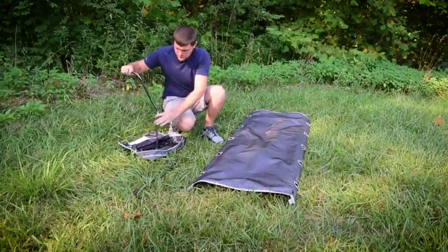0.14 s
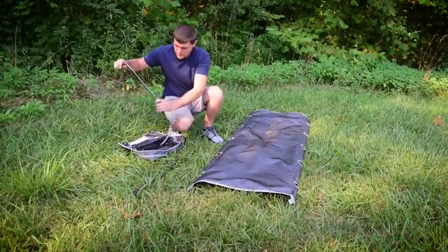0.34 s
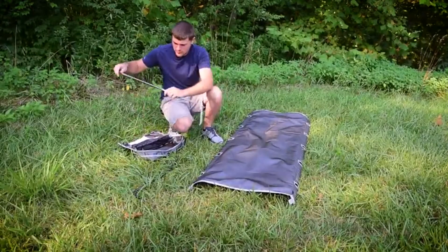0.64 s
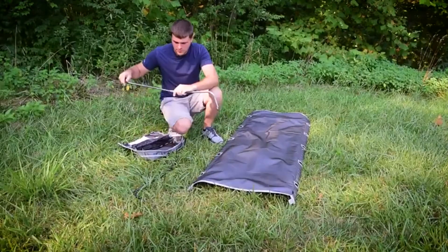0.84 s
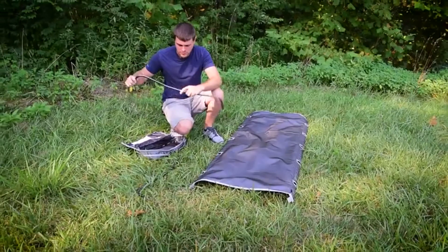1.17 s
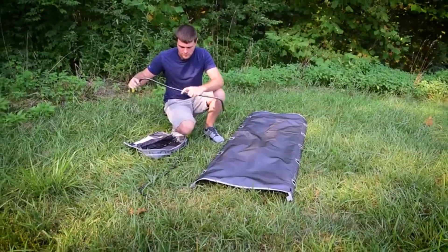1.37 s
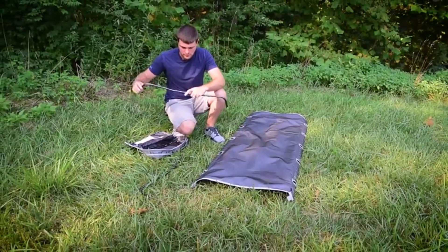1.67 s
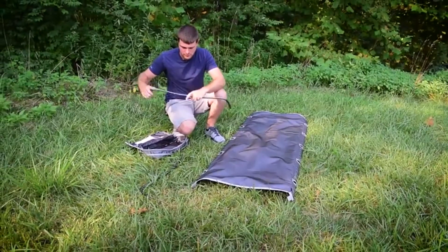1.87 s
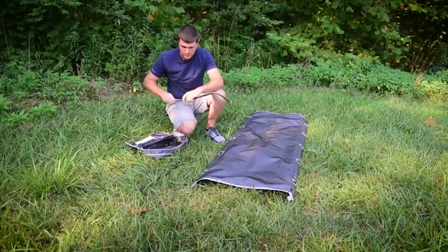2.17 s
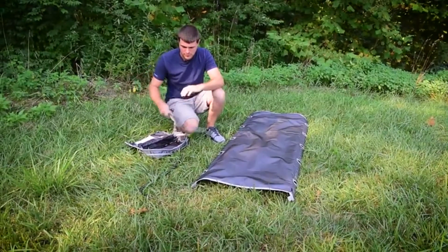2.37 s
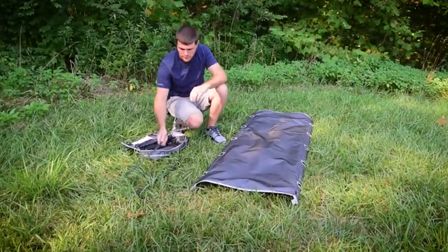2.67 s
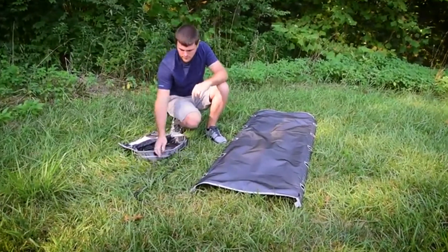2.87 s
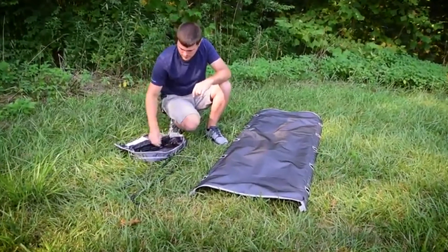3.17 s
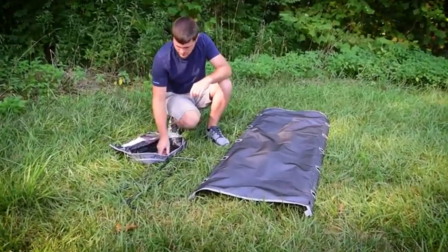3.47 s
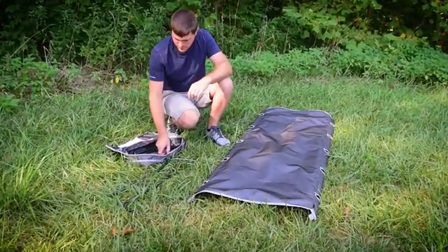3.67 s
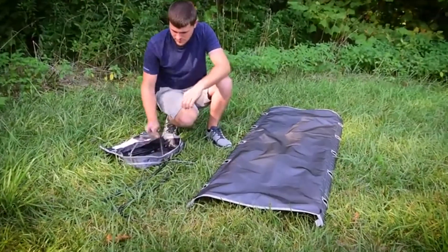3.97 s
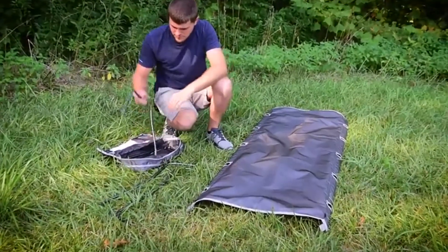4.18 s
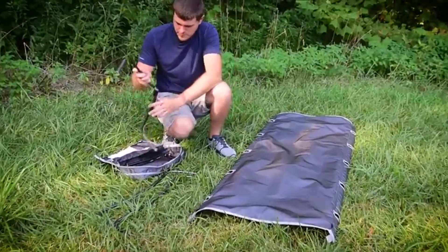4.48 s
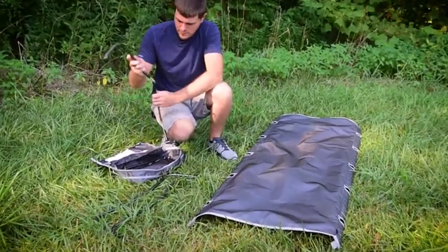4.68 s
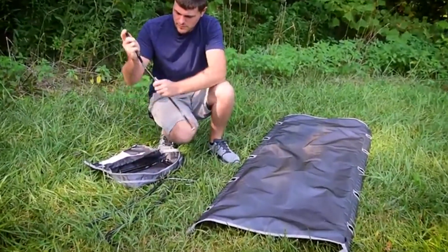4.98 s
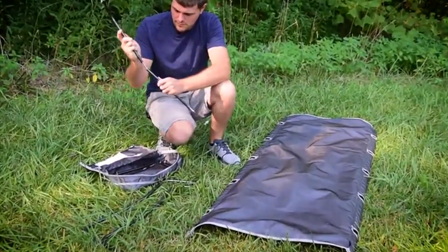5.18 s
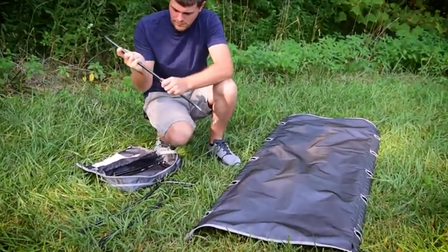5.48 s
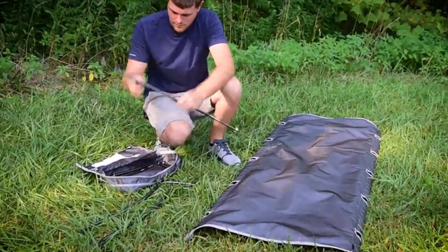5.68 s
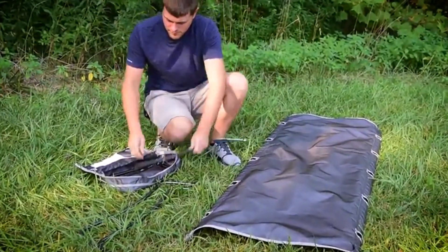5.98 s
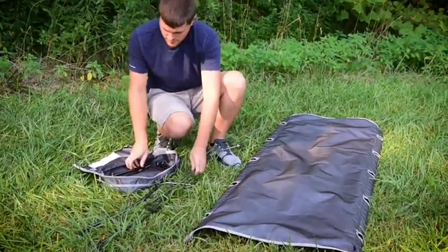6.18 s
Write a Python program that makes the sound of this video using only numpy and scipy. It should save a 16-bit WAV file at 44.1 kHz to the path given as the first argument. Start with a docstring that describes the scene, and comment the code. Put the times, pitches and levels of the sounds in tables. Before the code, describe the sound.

Thin metal tubes are pulled from a cloth bag and joined by hand on grass. An opening rattle gives way to isolated snaps, the strongest just before two seconds. Rummaging and clacking return midway, followed by light ticking, a rapid ratchety scrape and one hard knock, then a last rustle and clatter. Insects shimmer throughout above a very faint rumble; the microphone fills the left side only.

```python
"""Metal cot poles come out of a fabric bag and are plugged together by someone crouching on a lawn.
Loose poles clack, thud and scrape: noise cracks excite tube modes, and the bundle in the bag rings along.
Hand-damped joints snap home as short mode bursts; the last judders in by stick-slip before a sharp knock.
Rubbed cloth is grainy noise through bag resonances; insects and far-off rumble are filtered noise behind.
The microphone feeds the left channel; the right holds little but preamplifier hiss."""
import sys
import numpy as np
from scipy import signal
from scipy.fft import rfft, irfft
from scipy.io import wavfile
from scipy.ndimage import uniform_filter1d

SR = 44100
rng = np.random.default_rng(int(sys.argv[2]) if len(sys.argv) > 2 else 0)


def transcribe(u):
    """Save the signal u as a 16-bit wav file named by the first command-line argument.

    u: samples, shape (n,) or (channels, n), limited to [-1, 1]; the rate is SR.
    q: integer samples, one column per channel.
    """
    v = np.clip(np.atleast_2d(u).T, -1, 1)
    q = np.round(v * 32767).astype(np.int16)
    wavfile.write(sys.argv[1], SR, q)


N = 279153

# insect chorus swells: (time [s], base level [dB])
INSECT_SWELLS = [(0.0, -49.5), (0.9, -52), (1.6, -49), (1.83, -51), (3.45, -54.5), (3.95, -51.5),
                 (5.48, -49.5), (5.8, -53), (6.33, -53)]
# spectrum of the insects: (frequency [Hz], relative level [dB])
INSECT_SPECTRUM = [(1500, -47.5), (2300, -14), (2900, -6), (3500, 0), (4300, 1), (5200, -0.5), (6300, -1),
                   (7500, -6), (8800, -17), (11000, -26), (15500, -46)]
# spectrum of the far-off rumble: (frequency [Hz], relative level [dB])
AIR_SPECTRUM = [(20, -11), (55, -1), (110, 0), (220, -4), (500, -9), (1200, -12), (2500, -10.5),
                (8000, -37.5)]
# spectrum of preamplifier hiss: (frequency [Hz], relative level [dB])
HISS_SPECTRUM = [(20, -22), (100, -12), (300, -11.5), (1000, -14.5), (3000, -15.5), (8000, -16),
                 (12000, -16.5), (15000, -25.5)]
# a hand or a pole moving through the bag: (start [s], length [s], base level [dB], base centre [Hz])
BAG_STROKES = [(0.0, 0.13, -41, 800), (0.183, 0.059, -43, 1200), (0.278, 0.024, -44, 1190),
               (0.359, 0.041, -48, 700), (2.979, 0.17, -57.5, 1100), (3.423, 0.095, -44, 1270),
               (3.555, 0.091, -46, 1210), (3.665, 0.093, -43, 900), (3.781, 0.032, -42.5, 750),
               (3.877, 0.08, -41, 1000), (4.026, 0.13, -53, 821), (6.093, 0.07, -48.5, 1700),
               (6.141, .04, -50.5, 695), (6.179, 0.16, -44.5, 1310)]
# spectrum of rubbed cloth: (frequency [Hz], relative level [dB])
CLOTH_SPECTRUM = [(80, -44), (220, 3), (400, 9.5), (550, 5), (950, 5), (1600, 2.5), (2800, 4), (5000, -20),
                  (10000, -58), (15000, -65)]
# resonances that rubbing wakes in the bag and its poles: (frequency [Hz], base level [dB])
BAG_RESONANCES = [(420, -13.5), (530, -0.5), (830, -6), (1050, -5.5), (1420, -4), (2000, -10.5), (2900, -7)]
# spectrum of a metal contact: (frequency [Hz], relative level [dB])
CRACK_SPECTRUM = [(60, -23.5), (250, -9), (600, -4.5), (1500, -1), (3200, 0), (5000, -5), (7500, -9.5),
                  (10000, -16.5), (15000, -37)]
# modes of a pole: (base frequency [Hz], base level [dB])
POLE_MODES = [(930, 0), (1290, 2.5), (1470, -2.5), (1950, -3), (2400, 5), (2840, 4), (3060, 5.5),
              (3400, 9.5), (3780, 6.5), (4250, 6), (4800, 6), (5500, 6), (6250, 3), (6850, -3.5),
              (7900, -2), (8650, -5.5)]
# loose poles clacking together:
# (time [s], base level [dB], body re ring [dB], edge re ring [dB], strongest ring [Hz])
POLE_CLACKS = [(0.0411, -29.5, -8.5, -8.5, 3160), (0.0687, -20.5, -10, -5.5, 3100),
               (0.074, -17.5, -11.5, -10, 3950), (0.1019, -31.5, -7, -5.5, 2800),
               (0.282, -24.5, -9.5, -6, 3220), (0.351, -29, -10.5, -2, 2970), (0.375, -37, -12, -8, 2720),
               (3.515, -26, -19, -8, 2980), (3.5855, -35, -8, -17, 1390), (3.6534, -24, -15, -5, 4000),
               (3.664, -30.5, -4.5, -6, 2650), (3.7091, -26, -22, -5, 3000), (3.729, -31, -8, -17, 1466),
               (3.737, -25, -5.5, -5, 2940), (3.7983, -33, -11, -7.5, 3080), (3.886, -23, -13, -5, 2950),
               (3.893, -27, -31, -10, 3110), (3.905, -29, -11, -9, 2350), (3.912, -35, -17, -17, 2450),
               (3.937, -40.5, -4, -15, 2900), (4.15, -30, -22, -4.5, 3620), (4.1608, -24.5, -18, -3, 1627),
               (4.249, -34.5, -5, 2.5, 2870), (4.2676, -27.5, -9, -0.5, 4000), (4.275, -31, -22, -2, 4600),
               (6.212, -19.5, -17.5, -16, 1618), (6.214, -18, -31, -9.5, 2660), (6.218, -28, -14, -8, 4200),
               (6.277, -18.5, -14, -13, 5020), (6.295, -23, -34, -10.5, 4940),
               (6.3265, -26, -23, -12, 3670)]
# modes of the bundle left ringing in the bag: (base frequency [Hz], relative level [dB], t60 [s])
BUNDLE_MODES = [(407.5, -2.5, 0.11), (538, 2, 0.16), (940, -27, 0.11), (1480, -2, 0.15), (2800, -1.5, 0.18),
                (3050, 13.5, 0.12), (3400, -9, 0.21), (4040, -1, 0.076)]
# a pole bumps the bag, the ground or a palm, hollow and dull: (time [s], base level [dB], ring [Hz])
DULL_BUMPS = [(0.085, -34.5, 520), (0.245, -36, 523), (0.353, -36.5, 483), (0.398, -43.5, 523),
              (1.827, -47, 296), (3.403, -43, 543), (3.634, -40, 482), (3.666, -37, 493), (3.709, -38, 470),
              (3.737, -30.5, 960), (3.797, -37.5, 447), (4.082, -44, 560), (4.131, -41.5, 510),
              (4.156, -39.5, 535), (4.267, -31, 730), (4.28, -34, 520), (4.752, -39, 322),
              (5.471, -32.5, 630), (6.186, -38, 427)]
# short scuffs of hands, cloth and sliding poles: (time [s], length [s], base level [dB], centre [Hz])
SHORT_SCUFFS = [(0.098, 0.045, -46, 2680), (0.991, 0.049, -56, 1500), (1.392, 0.0087, -41, 1620),
                (1.801, 0.021, -44, 2980), (1.819, 0.019, -41, 2300), (1.835, 0.015, -44, 3980),
                (2.306, 0.026, -56, 1510), (2.937, 0.064, -48, 1210), (3.309, 0.053, -54.5, 567),
                (3.428, 0.041, -47.5, 1401), (3.741, 0.018, -39, 1600), (4.278, 0.039, -47, 1210),
                (4.348, 0.096, -51.5, 940), (4.512, 0.051, -41, 1780), (5.37, 0.11, -41, 2470),
                (5.777, 0.038, -56.5, 1340)]
# light dry taps of a pole against the grip or its neighbours: (time [s], level [dB], centre [Hz])
LIGHT_TAPS = [(0.245, -36, 1030), (0.281, -30, 10000), (0.309, -40.5, 1500), (0.469, -44, 1700),
              (1.037, -42, 1810), (1.228, -51.5, 1900), (2.893, -44, 2090), (2.983, -46, 2000),
              (3.007, -51, 1300), (3.503, -42, 2900), (3.544, -37, 5000), (3.634, -38.5, 2900),
              (3.963, -41, 5200), (3.993, -43, 1700), (4.326, -46, 2200), (4.391, -44, 1700),
              (4.683, -36, 1900), (4.733, -39, 900), (4.746, -36.5, 1500), (4.767, -38, 940),
              (4.774, -38.5, 1400), (4.784, -43, 890), (4.814, -42.5, 980), (4.818, -44, 1200),
              (4.831, -42, 1390), (4.847, -45, 676), (4.879, -45.5, 1190), (4.885, -45.5, 1490)]
# a pole dragged along its neighbours sings in one narrow, gliding resonance:
# (start [s], length [s], level [dB], start pitch [Hz], end pitch [Hz])
POLE_SCRAPES = [(0.253, 0.0324, -37.5, 1320, 1624), (3.479, 0.04, -47, 1295, 1690),
                (5.372, .02, -36, 3490, 3480)]
# joints snapping home:
# (time [s], base level [dB], base body [dB], base edge [dB], base t60 [s],
#  strongest ring [Hz], second ring [Hz], low ring [Hz], low ring re base level [dB])
JOINT_SNAPS = [(0.7054, -36.5, -8, -22, 0.013, 1910, 5100, 1280, -5),
               (0.707, -39.5, -26, -25, 0.012, 4440, 5400, 2900, -22),
               (1.3974, -26.5, -21.5, -13, 0.019, 4010, 4460, 1490, -13.5),
               (1.853, -22.5, -16, -5.5, 0.024, 2900, 4060, 1925, -10),
               (4.525, -30.5, -19, -22, 0.023, 3090, 3280, 1080, -14),
               (4.5313, -25, -12.5, -7, 0.015, 2305, 3620, 1420, -8),
               (4.7484, -28, -8, -3, 0.029, 4720, 3590, 2260, -10),
               (5.4708, -16.5, -12, -12, 0.013, 3900, 3370, 2320, -19)]

RUMMAGE_ATTACK_S, RUMMAGE_RELEASE_T60_S = 0.015, 0.32
# a firm clack presses the poles together and dies fast;
# a light one rings on and stirs the bundle relatively more
TYPICAL_CLACK_DB, CLACK_T60_S, T60_HALVING_DB, BUNDLE_FOLLOWS = -32, 0.038, 11.5, 0.76
# from this moment a hand holds the bundle and damps it
BUNDLE_HELD_S, BUNDLE_HELD_DB, HELD_T60_SHARE = 6.1, -10, 0.95
# a tight joint sticks and slips as it is pushed in,
# loudest at the start, weaker midway, stronger again at the end
PUSH_START_S, PUSH_END_S, SLIP_RING_HZ = 5.3858, 5.4678, 3260
SLIP_START_DB, SLIP_MIDWAY_DIP_DB, SLIP_END_RE_START_DB = -27, -3.5, -2
SLIP_QUICKENING = 0.92  # under 1: the slips come closer together as the push goes on
TOP_HZ = 15700


def undb(db):
    """Decibels to gain."""
    return 10 ** (np.asarray(db) / 20)


def unit(x):
    """Scale to rms 1."""
    return x / np.sqrt(np.mean(x ** 2) + 1e-18)


def colour(x, points):
    """Causal minimum-phase filter with the given (Hz, dB) spectrum."""
    size = 4096
    hz, db = np.transpose(points)
    bins = np.fft.rfftfreq(size, 1 / SR) + 1
    log_gain = np.log(undb(np.interp(np.log(bins), np.log(hz), db)))
    # folding the cepstrum forward in time makes the filter causal
    cepstrum = irfft(log_gain)
    cepstrum[1:size // 2] *= 2
    cepstrum[size // 2 + 1:] = 0
    impulse = irfft(np.exp(rfft(cepstrum)))
    return signal.fftconvolve(x, impulse)[:len(x)]


def band(x, hz, kind):
    """Butterworth low-pass or high-pass."""
    return signal.sosfilt(signal.butter(2, hz, kind, fs=SR, output="sos"), x)


def resonate(x, hz, q):
    """One resonance, gain 1 at its centre."""
    return signal.lfilter(*signal.iirpeak(hz, max(q, .5), fs=SR), x)


def walk(rate):
    """Random wandering with about rate new values a second, spread near 1."""
    k = int(SR / rate)
    steps = np.repeat(rng.standard_normal(N // k + 2), k)
    return unit(uniform_filter1d(steps, k))[:N]


def fade(t, t60):
    """Exponential decay, 60 dB in t60 seconds."""
    return np.exp(-np.log(1000) * t / t60)


def add(track, s, sound):
    """Mix a sound in at time s."""
    start = max(int(s * SR), 0)
    part = sound[:max(N - start, 0)]
    track[start:start + len(part)] += part


def burst_level(x, db, window_s=0.012):
    """Give a short burst the energy of window_s seconds at db."""
    return x * undb(db) * np.sqrt(window_s * SR / (np.sum(x ** 2) + 1e-18))


def insects(chorus_db=7, flicker_db=1.5, buzz_depth=0.16, buzz_hz=200):
    """Four noise voices with wavering buzz rates merge into a bright insect hiss that swells slowly."""
    t = np.arange(N) / SR
    chorus = np.zeros(N)
    for rate in buzz_hz * rng.uniform(0.72, 1.7, size=4):
        buzz_phase = 2 * np.pi * np.cumsum(rate * (1 + 0.027 * walk(4.9))) / SR
        buzz = 1 + buzz_depth * np.sin(buzz_phase)
        chorus += rng.standard_normal(N) * buzz * undb(flicker_db * walk(20.96))
    swell_db = np.interp(t, *np.transpose(INSECT_SWELLS))
    return unit(colour(chorus, INSECT_SPECTRUM)) * undb(swell_db + chorus_db)


def outdoor_air(air_db=-59.5, swell_db=1.65):
    """A faint far-off rumble: coloured noise whose level wanders."""
    rumble = unit(colour(rng.standard_normal(N), AIR_SPECTRUM))
    return rumble * undb(air_db + swell_db * walk(3.8))


def fabric(crease_rate=1500, rub_db=-3, flutter_db=1.4, flutter_rate=70,
           bag_db=4, bag_q=11, shift_db=4, shift_rate=20, stroke_q=0.28):
    """Cloth strokes of differing colour: creases buckle in tiny grains, bag resonances come and go."""
    t = np.arange(N) / SR
    creases = (rng.random(N) < crease_rate / SR) * rng.standard_normal(N)
    cloth = colour(unit(creases) + undb(rub_db) * rng.standard_normal(N), CLOTH_SPECTRUM)
    hollow = np.zeros(N)
    for hz, db in BAG_RESONANCES:
        hollow += resonate(cloth, hz, bag_q) * undb(bag_db + db + shift_db * walk(shift_rate))
    rustle = (cloth + hollow) * undb(flutter_db * walk(flutter_rate))
    out = np.zeros(N)
    for s, length, db, hz in BAG_STROKES:
        attack = np.clip((t - s) / RUMMAGE_ATTACK_S, 0, 1)
        release = fade(np.maximum(t - s - length, 0), RUMMAGE_RELEASE_T60_S)
        out += unit(resonate(rustle, hz, stroke_q)) * attack * release * undb(db)
    return out


def crackles(crackle_db=-5, pitch_ratio=1.1, pitch_spread=0.42, scatter_db=3, crackle_q=1.1):
    """While the bag is stirred, stiff folds buckle and small fittings tick, each on its own."""
    per_s, t60 = 55, .009
    out = np.zeros(N)
    t = np.arange(SR // 32) / SR
    for s, length, db, hz in BAG_STROKES:
        for when in np.arange(s, s + length, 1 / per_s):
            size, detune = rng.standard_normal(2)
            centre = np.clip(hz * pitch_ratio * np.exp(pitch_spread * detune), SR / 100, SR / 8)
            crack = colour(rng.standard_normal(len(t)) * fade(t, t60), CRACK_SPECTRUM)
            tick = resonate(crack, centre, crackle_q)
            tick_db = db + crackle_db + scatter_db * size
            add(out, when + rng.random() / per_s, burst_level(tick, tick_db))
    return out


def blow(db, body_db, edge_db, ring_hz, t60, main_db=-3, rise_s=0.00042, main_q=5, crack_db=0,
         scatter_db=3, body_hz=1200, edge_hz=5200):
    """Metal meets metal: a gritty crack and damped tube modes, one region favoured by the contact point."""
    t = np.arange(SR // 8) / SR
    decay = fade(t, max(t60, .004)) * (1 - np.exp(-t / rise_s))
    hz, mode_db = np.transpose(POLE_MODES)
    detune, strength, phase = rng.standard_normal((len(hz), 3)).T
    # the grip shifts and weights the modes anew each time
    mode_hz = hz * (1 + .015 * detune)
    waves = np.sin(2 * np.pi * (np.outer(mode_hz, t) + phase[:, None]))
    modes = undb(mode_db + scatter_db * strength) @ waves
    crack = colour(rng.standard_normal(len(t)) * decay, CRACK_SPECTRUM)
    main = resonate(resonate(crack, ring_hz, main_q), ring_hz, main_q)
    tube = burst_level(modes * decay, 0) + burst_level(crack, crack_db)
    # the contact sets the share of dull body and bright edge around the ring
    body = band(band(tube, body_hz, "low"), body_hz, "low")
    edge = band(band(tube, edge_hz, "high"), edge_hz, "high")
    ring = band(band(tube + burst_level(main, main_db), body_hz, "high"), edge_hz, "low")
    return burst_level(ring, db) + burst_level(body, db + body_db) + burst_level(edge, db + edge_db)


def loose_poles(clack_db=-2, bundle_db=-43, rattle_db=-41, rattle_t60=0.11):
    """Each clack sets the poles still in the bag ringing and rattling faintly."""
    out = np.zeros(N)
    t = np.arange(SR // 4) / SR
    for s, db, body_db, edge_db, ring_hz in POLE_CLACKS:
        force_db = db - TYPICAL_CLACK_DB
        held = s > BUNDLE_HELD_S
        t60 = CLACK_T60_S * 2 ** (-force_db / T60_HALVING_DB) * (HELD_T60_SHARE if held else 1)
        add(out, s, blow(db + clack_db, body_db, edge_db, ring_hz, t60))
        ring = np.zeros(len(t))
        # neighbouring poles are not quite alike, so each mode sounds as a beating cluster
        for hz, mode_db, life in BUNDLE_MODES:
            size, detune = rng.standard_normal(size=(3, 2)).T
            cluster = size @ np.sin(2 * np.pi * np.outer(hz * (1 + 0.0112 * detune), t))
            ring += undb(mode_db) * fade(t, life) * cluster
        rattle = colour(rng.standard_normal(len(t)) * fade(t, rattle_t60), CRACK_SPECTRUM)
        stir_db = BUNDLE_FOLLOWS * force_db + BUNDLE_HELD_DB * held
        bundle = burst_level(ring, bundle_db) + burst_level(rattle, rattle_db)
        add(out, s, undb(stir_db) * bundle)
    return out


def thuds(thud_db=-1, t60=0.048, rise_s=0.00054, thud_q=2.12, overtone=1.475, overtone_db=-7):
    """Soft bumps that ring one low, broad resonance and a weaker overtone."""
    out = np.zeros(N)
    t = np.arange(SR // 6) / SR
    for s, db, hz in DULL_BUMPS:
        push = rng.standard_normal(len(t)) * fade(t, t60) * (1 - np.exp(-t / rise_s))
        low, high = (resonate(resonate(push, f, thud_q), f, thud_q) for f in (hz, hz * overtone))
        add(out, s, burst_level(low + undb(overtone_db) * high, db + thud_db))
    return out


def scuffs(scuff_db=7.0, catch_rate=900, rub_db=-6, scuff_q=0.61, top_ratio=2.15):
    """Brief rubs that swell and fade: dense little catches of friction in one broad resonance."""
    out = np.zeros(N)
    t = np.arange(SR // 6) / SR
    for s, length, db, hz in SHORT_SCUFFS:
        stroke = np.sin(np.pi * np.minimum(t / max(length, .005), 1))
        catches = (rng.random(len(t)) < catch_rate / SR) * rng.standard_normal(len(t))
        friction = unit(catches) + undb(rub_db) * rng.standard_normal(len(t))
        rub = band(resonate(friction, hz, scuff_q), min(hz * top_ratio, SR / 3), "low")
        add(out, s, unit(rub) * stroke * undb(db + scuff_db))
    return out


def taps(tap_q=0.92, rise_s=0.00007):
    """Small, quickly damped contacts, each a crack in one broad resonance."""
    t60 = .016
    out = np.zeros(N)
    t = np.arange(SR // 16) / SR
    for s, db, hz in LIGHT_TAPS:
        contact = rng.standard_normal(len(t)) * fade(t, t60) * (1 - np.exp(-t / rise_s))
        crack = colour(contact, CRACK_SPECTRUM)
        add(out, s, burst_level(resonate(crack, hz, tap_q), db))
    return out


def scrapes(half_width_hz=70, roundness=0.46):
    """Friction keeps a narrow resonance alive while the sliding contact moves its pitch."""
    out = np.zeros(N)
    t = np.arange(SR // 6) / SR
    for s, length, db, start_hz, end_hz in POLE_SCRAPES:
        progress = np.minimum(t / max(length, .005), 1)
        phase = 2 * np.pi * np.cumsum(start_hz + (end_hz - start_hz) * progress) / SR
        # slow noise on both quadratures makes a narrow noise band around the gliding pitch
        grip = band(rng.standard_normal((2, len(t))), half_width_hz, "low")
        ring = unit(grip[0] * np.cos(phase) + grip[1] * np.sin(phase))
        add(out, s, ring * np.sin(np.pi * progress) ** roundness * undb(db))
    return out


def joints(snap_db=-1.5, first_db=-5, second_db=-9, ring_t60_ratio=1.52, swell_s=0.00048,
           rim_db=-21, rim_hz=8000, rim_t60=0.037):
    """Hand-held sections snap home; joined length and grip decide which tube modes stand out."""
    out = np.zeros(N)
    t = np.arange(SR // 8) / SR
    for s, db, body_db, edge_db, t60, first_hz, second_hz, low_hz, low_db in JOINT_SNAPS:
        knock = blow(db + snap_db, body_db + 4.0, edge_db + 3.5, first_hz, t60,
                     main_db=-5.5, rise_s=0.001, main_q=7.4, crack_db=-1.5)
        add(out, s, knock)
        decay = fade(t, t60 * ring_t60_ratio) * (1 - np.exp(-t / swell_s))
        for hz, ring_db in ((first_hz, first_db), (second_hz, second_db), (low_hz, low_db)):
            ring = decay * np.sin(2 * np.pi * (hz * t + rng.random()))
            add(out, s, burst_level(ring, db + ring_db))
        # the hard rims add a faint, very bright tick
        rim = band(rng.standard_normal(len(t)) * fade(t, rim_t60), rim_hz, "high")
        add(out, s, burst_level(rim, db + rim_db))
    return out


def judder(count=10, jitter_s=0.0004, ring_spread=0.047, scatter_db=1.5, under_hz=2500, under_db=-5,
           under_lag_s=.0016, jolt_db=-23, jolt_hz=90):
    """Stick-slip in the tight joint: each slip rings the tube, catches again lower and jolts the hands."""
    out = np.zeros(N)
    t = np.arange(SR // 8) / SR
    slip_t60 = .009
    chances = rng.standard_normal((count, 4))
    for progress, (late, detune, size, lag) in zip(np.linspace(0, 1, count), chances):
        travel = progress ** SLIP_QUICKENING
        s = PUSH_START_S + travel * (PUSH_END_S - PUSH_START_S) + jitter_s * late
        dip_db = SLIP_MIDWAY_DIP_DB * np.sin(np.pi * progress)
        db = SLIP_START_DB + dip_db + SLIP_END_RE_START_DB * progress + scatter_db * size
        second_catch = (under_hz, under_db, under_lag_s * abs(lag))
        for hz, ring_db, lag_s in ((SLIP_RING_HZ, 0, 0), second_catch):
            slip = blow(db + ring_db, body_db=-16, edge_db=-15, ring_hz=hz * np.exp(ring_spread * detune),
                        t60=slip_t60, main_db=3.5, rise_s=0.0012, main_q=3.6)
            add(out, s + lag_s, slip)
        shove = rng.standard_normal(len(t)) * fade(t, 0.035)
        jolt = band(resonate(shove, jolt_hz, 0.77), jolt_hz, "low")
        add(out, s, burst_level(jolt, db + jolt_db))
    return out


def scene(leak_db=-50):
    """Everything reaches one microphone on the left; a trace leaks to the right."""
    poles = joints() + judder() + taps() + loose_poles() + scrapes() + thuds()
    microphone = poles + scuffs() + fabric() + crackles() + insects() + outdoor_air()
    return np.array([microphone, undb(leak_db) * microphone])


def record(dry, hiss_db=-60):
    """The tallest peaks are rounded softly, hiss is added on both channels, then the top is cut."""
    ceiling = .8
    hiss = np.array([unit(colour(rng.standard_normal(N), HISS_SPECTRUM)) for _ in dry])
    wet = ceiling * np.tanh(dry / ceiling) + undb(hiss_db) * hiss
    return signal.sosfilt(signal.ellip(8, .2, 70, TOP_HZ, fs=SR, output="sos"), wet)


dry = scene()
out = record(dry)
transcribe(out)
```